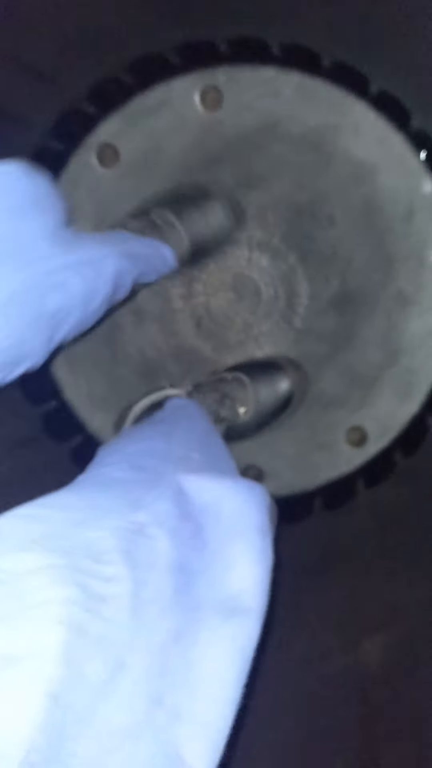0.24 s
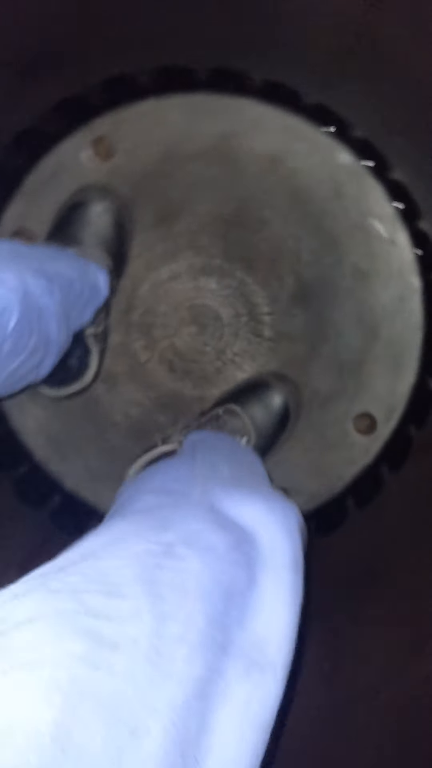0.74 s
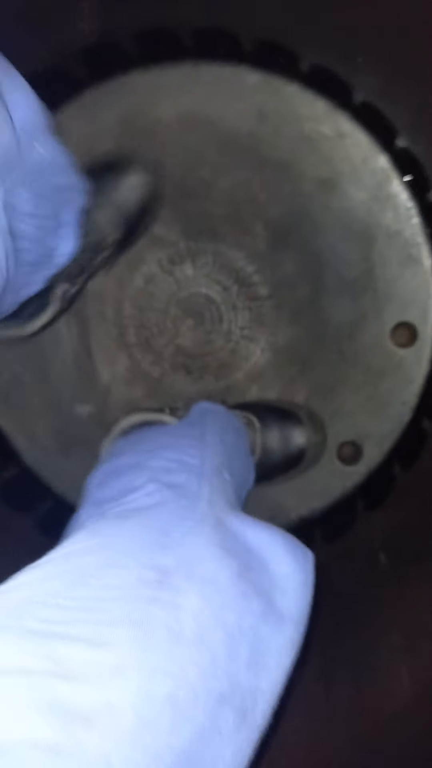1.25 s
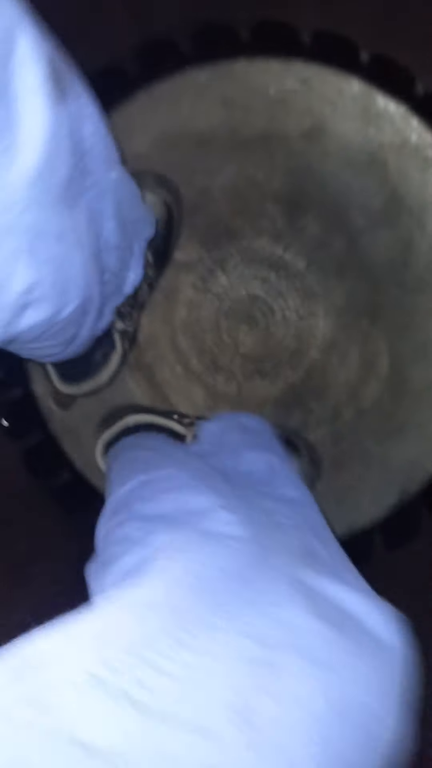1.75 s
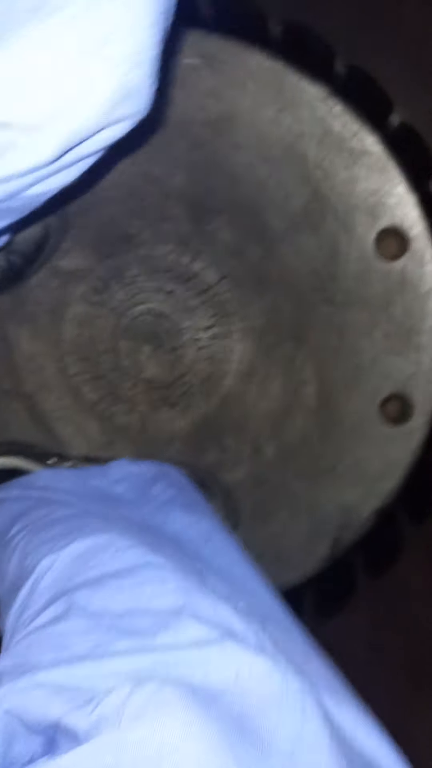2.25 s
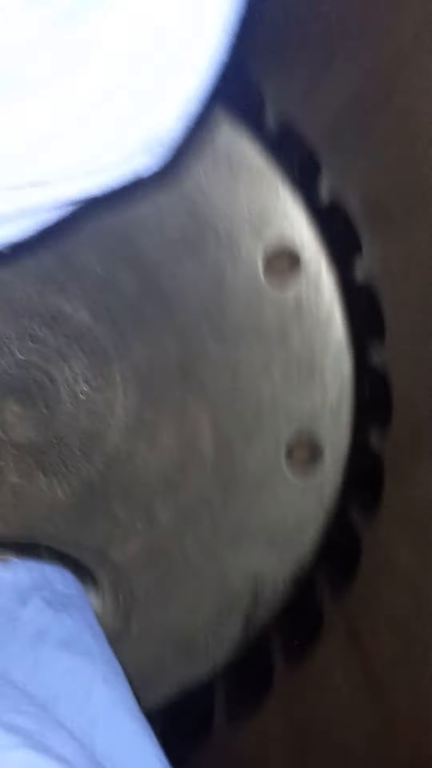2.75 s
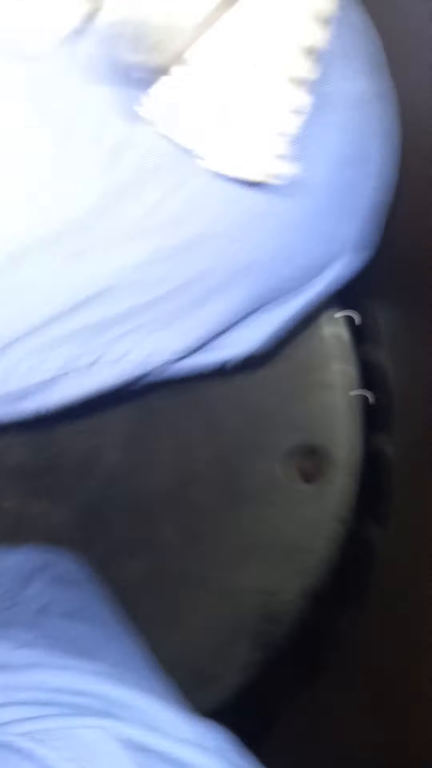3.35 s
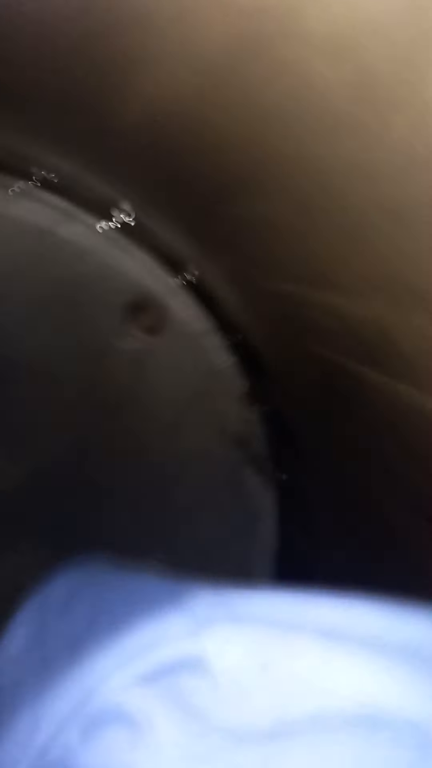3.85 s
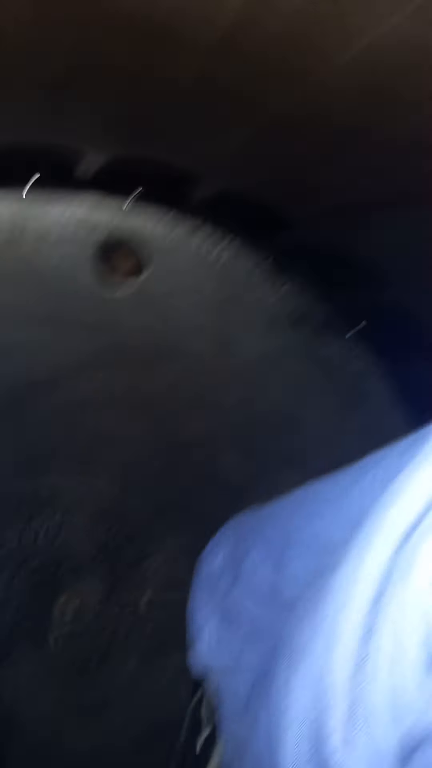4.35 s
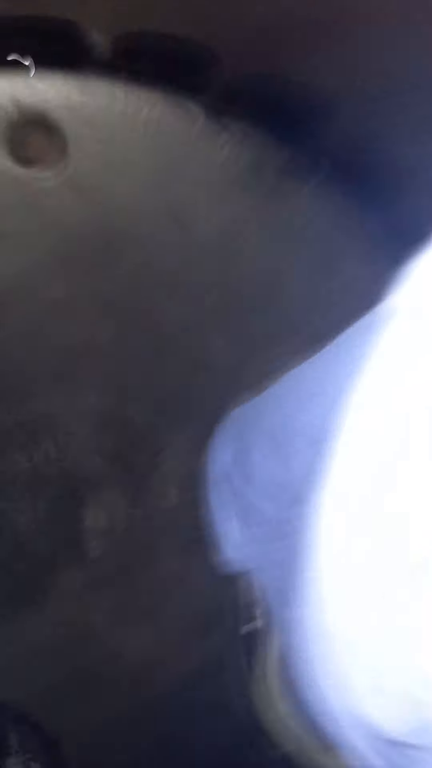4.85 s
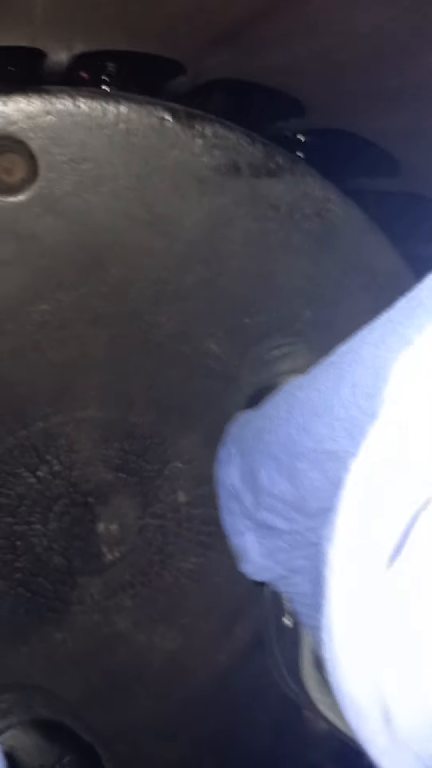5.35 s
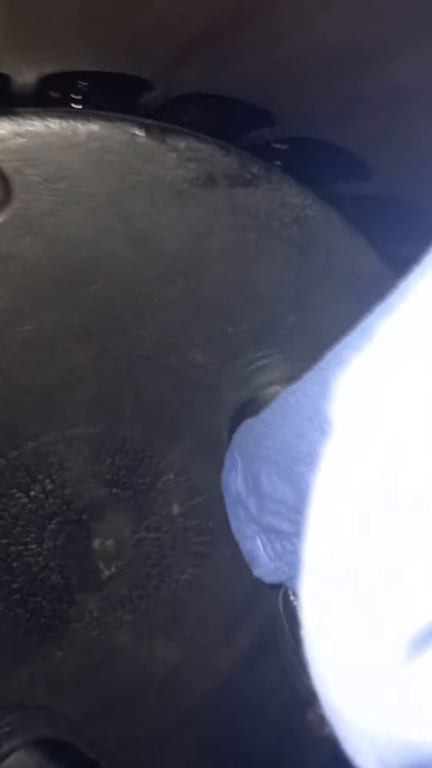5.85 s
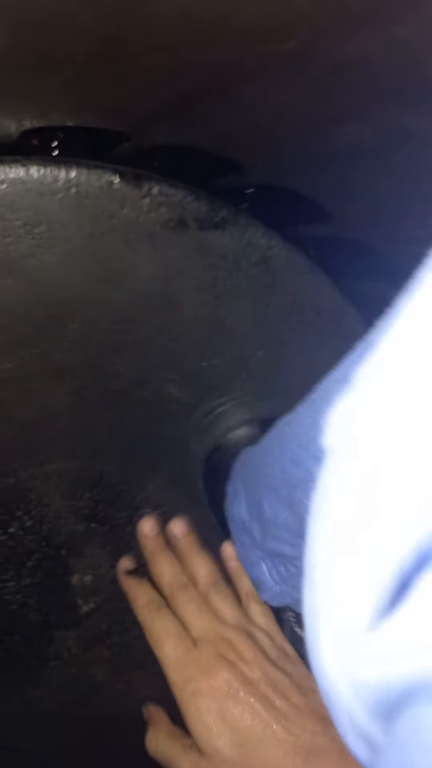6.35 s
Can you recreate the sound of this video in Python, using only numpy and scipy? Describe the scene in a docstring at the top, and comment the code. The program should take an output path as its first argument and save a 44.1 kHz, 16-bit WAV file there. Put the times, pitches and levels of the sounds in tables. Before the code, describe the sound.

Inside an opened engine cylinder on a ship, steady machinery noise is heard from a microphone held by someone standing on the piston. From 0 s a deep boom near 82 hertz dominates, throbbing about seven and a half times a second, with soft rumble, wavering motor hums and a faint airy ventilation roar slightly to the left. A narrow hollow swell slowly rises in pitch. Between 0.9 and 1.8 s boots make a few very faint, short gritty scuffs on steel. From about 1.6 s the microphone sinks and the tone colour shifts; the boom fades from 2.4 s, weakest around 4.6 s. At 3.9 s a tiny dry tick rattles close by and dies at once. The boom partly returns by 5 s, among thicker low-mid hums that beat slowly, while the ventilation grows brighter and moves right, continuing unresolved to 6.6 s.

```python
"""A ship's engine room heard from inside an opened cylinder, by someone standing on the piston and slowly crouching.
From the start a diesel generator drives the liner's air column into a throbbing boom, summed from engine orders;
motors hum as wavering tones, and the ventilation roars in through the open top as coloured noise.
Boots scuff in short noise bursts; then the microphone sinks through the standing waves, so the colour shifts.
The boom weakens, a tick of decaying modes sounds close by, and the ventilation grows towards the end."""
import sys
import numpy as np
from scipy import signal
from scipy.fft import rfft, irfft, next_fast_len
from scipy.io import wavfile

SR = 44100
rng = np.random.default_rng(int(sys.argv[2]) if len(sys.argv) > 2 else 0)


def inscribe(sig):
    """Save sig as 16-bit PCM at rate SR to the path in sys.argv[1].

    A 1-D sig is mono; a 2-D sig holds one channel per row.
    Samples are clipped to [-1, 1] before scaling.
    """
    pcm = np.round(np.clip(np.atleast_2d(sig).T, -1, 1) * 32767)
    wavfile.write(sys.argv[1], SR, pcm.astype(np.int16))


N = 291501
TIME = np.arange(N) / SR  # s
FREQS = np.maximum(np.arange(N // 2 + 1) * SR / N, 1)  # Hz
CYCLE_HZ = 7.4865  # engine cycles per second


def from_db(db):
    """Level is logarithmic: 20 dB is a factor of ten in amplitude."""
    return 10 ** (np.asarray(db) / 20)


def rms_one(x):
    """Mean square measures power: scale it to one."""
    return x / np.sqrt(np.mean(x ** 2) + 1e-20)


def in_time(rows):
    """Linear interpolation in time of each column after the first."""
    seconds, *columns = np.transpose(rows)
    return [np.interp(TIME, seconds, column) for column in columns]


def per_hz(points):
    """Pitch is logarithmic: join a table by straight lines over log frequency."""
    hz, value = np.transpose(points)
    return np.interp(np.log(FREQS), np.log(hz), value)


def panned(db):
    """Interaural level difference: gains for left minus right in dB."""
    return from_db(np.array([[1], [-1]]) * db / 2)


def at_posture(posture, values):
    """Linear interpolation between the standing, bent and crouched values."""
    return np.interp(posture, np.arange(len(values)), values)


def standing_wave(posture, levels_db):
    """Pressure in a standing wave depends on place: gain of one pitch where the microphone is."""
    return from_db(at_posture(posture, levels_db))


def drift(rate):
    """Low-pass filtered noise wanders smoothly, here with spread 1 and a corner at rate in Hz."""
    step, settle = 100, 2000  # samples per slow point, slow points dropped
    pole = np.exp(-2 * np.pi * rate * step / SR)
    draws = rng.standard_normal(N // step + settle + 2)
    slow = signal.lfilter([1], [1, -2 * pole, pole * pole], draws)[settle:]
    return np.interp(np.arange(N) / step, np.arange(len(slow)), rms_one(slow))


# Likeness of left and right in noise. Each row: frequency in Hz, correlation from 0 to 1.
LIKENESS = [(60, .99), (150, .997), (220, .985), (380, .9), (640, .45), (1300, .1), (2500, 0), (15000, 0)]


def noise(gain):
    """Interaural coherence: coloured noise, alike on both sides in the bass, with unit power in its middle."""
    size = next_fast_len(N, True)
    grid = np.arange(size // 2 + 1) * SR / size
    alike = np.clip(np.interp(grid, FREQS, per_hz(LIKENESS)), -1, 1)
    shape = np.interp(grid, FREQS, gain) * np.sqrt([1 + alike, 1 - alike])
    spectra = rfft(rng.standard_normal((2, size))) * shape
    mid, side = irfft(spectra, size)[:, :N]
    return np.array([mid + side, mid - side]) / np.std(mid)


def tone(hz, waver, spread_hz=700):
    """Phase difference grows as waves shorten: a wavering stereo tone with unit power in its middle."""
    turns = hz * TIME + rng.random()
    flutter = (1 + waver * (drift(2.5) + 1j * drift(0.72))) / np.sqrt(1 + 2 * waver ** 2)
    apart = min((hz / spread_hz) ** 2, 1) * rng.choice([-1, 1]) * np.pi / 4  # radians from the middle
    wave = np.sqrt(2) * flutter * np.exp(2j * np.pi * turns)
    return wave.real + np.tan(apart) * wave.imag * np.array([[1], [-1]])


# Course of the ventilation. Each row: time in seconds, roar in relative dB, left minus right in dB.
VENT = [(0, -42.5, -4.5), (1.2, -41.5, -4.5), (2.3, -43.4, -3), (3.0, -41.6, -5.5), (3.6, -40, -2.5),
        (4.05, -38, 1.1), (5.1, -36, 5), (6.6, -34, 5)]
# Spectra of roar and hiss. Each row: frequency in Hz, relative density in dB per Hz.
ROAR_SPECTRUM = [(300, -10.5), (560, -7), (700, 0.5), (780, -2), (870, -1.5), (1050, -3), (1300, -3),
                 (1600, -9), (1830, -12.5), (2100, -11.5), (2600, -23), (4000, -56.5)]
HISS_SPECTRUM = [(1500, -23), (2200, -1), (2800, 1), (3600, -4.5), (4500, -8.5), (5400, -10.5),
                 (6800, -10.5), (7400, -22), (8300, -22.5), (10000, -20.5), (12200, -19.5), (15500, -25)]
ROAR_DB, HISS_DB = 0.71, -0.5  # offsets
HISS_FOLLOWS = 1.3016  # dB of hiss per dB in the course


def ventilation(shake=0.064):
    """Turbulence makes broadband noise: air from above, shaken by the engine, louder as the microphone turns to it."""
    level_db, pan_db = in_time(VENT)
    beat = sum(np.cos(2 * np.pi * order * CYCLE_HZ * TIME) for order in (1, 2, 10, 12, 16))
    roar_gain = from_db(ROAR_DB + level_db + 0.4 * drift(2.4)) * (1 + shake * beat)
    hiss_gain = from_db(HISS_DB + HISS_FOLLOWS * level_db + 0.38 * drift(8))
    roar = roar_gain * noise(from_db(per_hz(ROAR_SPECTRUM)))
    hiss = hiss_gain * noise(from_db(per_hz(HISS_SPECTRUM)))
    return roar * panned(pan_db) + hiss * panned(0.28 * pan_db)


# Spectrum of the rumble. Each row: frequency in Hz, relative density in dB per Hz.
RUMBLE_SPECTRUM = [(15, -3), (30, 2.5), (45, 11), (70, -2), (150, -2), (400, -13.5), (900, -44.5)]
RUMBLE_DB = -45.5  # level
# Air resonances of the liner. Each row: frequency in Hz, nominal width in Hz,
# standing level in dB, bent level in dB, crouched level in dB.
AIR_MODES = [(60, 13, -39, -39.5, -30), (73.6, 14, -33, -37, -33), (121, 18, -39, -32, -33.5),
             (146, 32, -54, -37.5, -31), (172, 10, -61, -46.5, -29.5), (207.4, 18, -37, -54.5, -34.5),
             (252.2, 14, -45, -41.5, -36.5), (301, 66, -42, -43, -39), (371.3, 46, -52.5, -45, -36),
             (427, 40, -43.5, -51.5, -39.5), (479.6, 76, -52, -43.5, -35), (548, 87, -47, -48, -34.5)]


def liner(posture):
    """Resonance selects from noise: the din of the room rings in the air modes of the steel tube."""
    out = from_db(RUMBLE_DB) * noise(from_db(per_hz(RUMBLE_SPECTRUM)))
    for hz, width, *levels in AIR_MODES:
        detuning = (FREQS ** 2 - hz ** 2) / (FREQS * width)
        out = out + standing_wave(posture, levels) * noise(1 / (1 + detuning ** 2 / 2))
    return out


# Level of the sliding swell: standing, bent and crouched, in dB.
SLIDE_DB = (-38, -39, -67)
SLIDE_START_HZ, SLIDE_TOP_HZ, SLIDE_HZ_PER_S = 266.1, 367, 27
SLIDE_ATTACK_S = 0.9


def sliding_swell(posture, width_hz=30):
    """Shorter paths reinforce higher pitches: a narrow band of the din rises as the way to the piston shortens."""
    hz = np.minimum(SLIDE_START_HZ + SLIDE_HZ_PER_S * TIME, SLIDE_TOP_HZ)
    gain = standing_wave(posture, SLIDE_DB) * np.sqrt(np.minimum(TIME / SLIDE_ATTACK_S, 1))
    wobble = drift(width_hz / 2) + 1j * drift(width_hz / 2)  # spreads the carrier into a band
    carrier = np.exp(2j * np.pi * np.cumsum(hz) / SR)
    return gain * (wobble * carrier).real


# Hum and whine of pumps and fans. Each row: frequency in Hz,
# standing, bent and crouched levels in relative dB.
MOTORS = [(118.3, -37, -36, -33), (613.8, -54, -56, -43.5), (718, -58, -59, -56), (853, -61, -57, -50),
          (959, -63, -63, -54), (1227.5, -66, -62, -56), (1400, -64, -63, -58), (1707.5, -66, -63, -53),
          (1923, -73, -71, -65), (2561.5, -75, -76, -69)]


def motors(posture, level_db=2.5):
    """Rotation gives discrete tones: pumps and fans, each at its own speed."""
    tones = [standing_wave(posture, levels) * tone(hz, waver=0.23) for hz, *levels in MOTORS]
    return from_db(level_db) * sum(tones)


# Pairs of machines at nearly the same speed. Each row: frequency in Hz, beats per second,
# moment of a swell in seconds, depth from 0 to 1, standing, bent and crouched levels in dB.
HUMS = [(144.3, 2.04, 3.53, .45, -53, -31, -25), (254.5, 1.55, 3.45, .3, -46, -40, -37),
        (358.3, 1.52, 5.92, .7, -54, -43, -33)]


def hums(posture):
    """Two nearly equal tones beat: strong machine hums swell and fade slowly."""
    out = 0
    for hz, beat_hz, swell_s, depth, *levels in HUMS:
        beat = 1 + depth * np.cos(2 * np.pi * beat_hz * (TIME - swell_s))
        out = out + beat * standing_wave(posture, levels) * tone(hz, waver=0.19)
    return out


# Boots and clothes on steel. Each row: start in seconds, level in dB, length in seconds.
SCUFFS = [(.92, -61, 0.032), (1.08, -65.5, 0.27), (1.293, -58, 0.06), (1.73, -57, 0.026),
          (1.803, -55, 0.0067)]
# Spectrum of the scuffs. Each row: frequency in Hz, relative density in dB per Hz.
SCUFF_SPECTRUM = [(1500, -14.5), (3500, 2), (5000, 4), (6800, -1.5), (7600, -14), (12500, -12),
                  (15500, -10.5)]


def scuffs(grain_db=1.0):
    """Sliding friction makes irregular noise: short gritty rubs of a sole on the piston crown."""
    stroke = 0
    for start, db, length in SCUFFS:
        progress = np.clip((TIME - start) / length, 0, 1)
        stroke = stroke + from_db(db) * np.sqrt(np.sin(np.pi * progress).clip(0))
    return stroke * from_db(grain_db * drift(120)) * noise(from_db(per_hz(SCUFF_SPECTRUM)))


# A small hard tick and its rebounds. Each row: time in seconds, level in relative dB.
TICKS = [(3.8901, 0), (3.8914, -3), (3.8923, -8), (3.8939, -8), (3.8962, -16)]
# What the tick rings with. Each row: frequency in Hz, level in relative dB, 60 dB decay time in seconds.
TICK_MODES = [(520, -16, 0.0098), (990, -15.5, 0.0056), (1720, -25.5, 0.0057), (2680, -29, 0.0045),
              (3820, -32, 0.0061), (4700, -36, 0.0039), (6100, -36, 0.008), (9700, -39, 0.0025),
              (12400, -39, .003)]


def tick():
    """Impact excites damped modes: a dry contact beside the microphone, each blow dead in milliseconds."""
    clicks, out = np.zeros(N), np.zeros(N)
    for seconds, db in TICKS:
        clicks[round(seconds * SR)] = from_db(db)
    for hz, db, t60 in TICK_MODES:
        radius = np.exp(-np.log(1000) / (t60 * SR))  # decay per sample
        angle = 2 * np.pi * hz / SR
        poles = [1, -2 * radius * np.cos(angle), radius * radius]
        # the tiny offset keeps the filter clear of vanishingly small numbers
        out += from_db(db) * signal.lfilter([0, np.sin(angle)], poles, clicks + 1e-18)
    return out


# Further engine orders. Each row: multiple of the engine cycle,
# standing level in dB, bent level in dB, crouched level in dB.
ENGINE_ORDERS = [(15, -35, -36, -33), (16, -37, -40, -33), (17, -38, -39, -38), (18, -46, -42, -35),
                 (19, -51, -37, -28), (20, -62, -44, -28), (21, -64, -40, -32), (22, -58, -50, -37),
                 (25, -49, -64, -37), (26, -44, -61, -40), (28, -45, -52, -38), (30, -47, -53, -40),
                 (33, -48, -41, -46), (36, -37, -43, -34), (39, -37, -46, -37), (40, -47, -52, -44),
                 (51, -50, -56, -38), (56, -47, -54, -49), (61, -55, -48, -40), (66, -54, -50, -39)]


def generator(posture):
    """A periodic source has harmonics: higher multiples of the engine cycle make a steady, knocking drone."""
    return sum(standing_wave(posture, levels) * tone(order * CYCLE_HZ, waver=0.21)
               for order, *levels in ENGINE_ORDERS)


BOOM_ORDER = 11  # multiple of the engine cycle
THROB_S = 0.03198  # moment in each engine cycle that the orders are timed from
# Engine order on the resonance of the air column. Each row: time in seconds, level in dB.
BOOM = [(0, -11.5), (.6, -9), (1.05, -12), (1.5, -9), (2.35, -9), (2.8, -14), (3.7, -18), (4.6, -22.5),
        (5.1, -16), (6.6, -17.5)]
# Its neighbours, which beat with it. Each row: multiple of the engine cycle,
# standing level in dB, bent level in dB, crouched level in dB.
FLANKS = [(8, -41, -36, -30), (9, -44, -42, -22), (10, -25, -23.5, -24), (12, -23.5, -26.5, -24),
          (13, -38, -40, -39), (14, -34, -41, -31)]
# How far each throb is drawn out: standing, bent and crouched, in turns per squared order offset.
SMEAR_TURNS = (-.14, 0.07, .055)
# Brief dips of the boom. Each row: time in seconds, depth in dB.
DIPS = [(.92, -4), (1.95, -4)]
DIP_WIDTH_S = 0.034  # from the centre to 1/e of the depth


def throb(posture, wander_db=1.0):
    """Superposition: orders around the air column's resonance draw into step once a cycle and swell together."""
    cycles = CYCLE_HZ * (TIME - THROB_S)
    smear = at_posture(posture, SMEAR_TURNS)
    dips_db = sum(db * np.exp(-((TIME - seconds) / DIP_WIDTH_S) ** 2) for seconds, db in DIPS)
    boom_gain = from_db(in_time(BOOM)[0] + dips_db + wander_db * drift(3.2))
    out = boom_gain * np.cos(2 * np.pi * BOOM_ORDER * cycles)
    for order, *levels in FLANKS:
        shift = smear * (order - BOOM_ORDER) ** 2  # the resonance holds some pitches back longer
        out = out + standing_wave(posture, levels) * np.cos(2 * np.pi * (order * cycles + shift))
    return np.sqrt(2) * out  # peak to rms level


# The microphone's way down the liner. Each row: time in seconds, posture (0 standing, 1 bent, 2 crouched).
POSTURE = [(0, 0.035), (1.6, 0.023), (2.4, 0.77), (3.1, 0.83), (3.7, 1.34), (4.2, 1.64), (4.8, 1.85),
           (5.7, 2.02)]
# Balance of throb and hums, left minus right: standing, bent and crouched, in dB.
DRONE_PAN_DB = (-0.45, -1.35, -1.67)


def scene():
    """Sound pressures add: machinery through the liner, and the small sounds inside it."""
    posture, = in_time(POSTURE)
    din = liner(posture) + sliding_swell(posture) + motors(posture) + generator(posture)
    drone = (hums(posture) + throb(posture)) * panned(at_posture(posture, DRONE_PAN_DB))
    return ventilation() + din + scuffs() + tick() + drone


def record(dry):
    """Low-pass filtering: the top of the treble is cut steeply."""
    cutoff_hz = 15750
    lowpass = signal.ellip(12, 0.1, 90, cutoff_hz, fs=SR, output="sos")  # order, ripple dB, rejection dB
    return signal.sosfilt(lowpass, dry)


dry = scene()
out = record(dry)
inscribe(out)
```